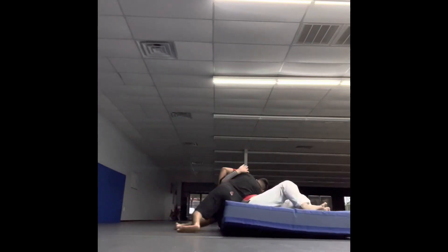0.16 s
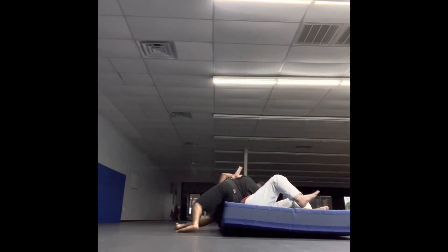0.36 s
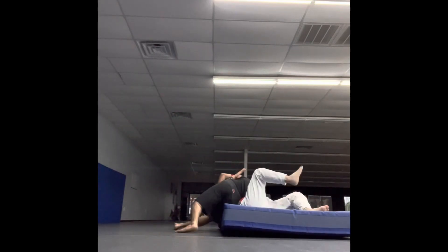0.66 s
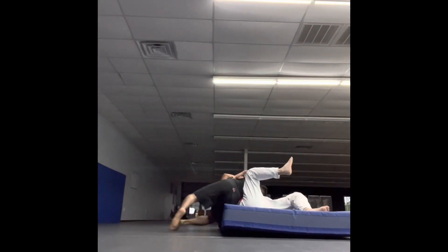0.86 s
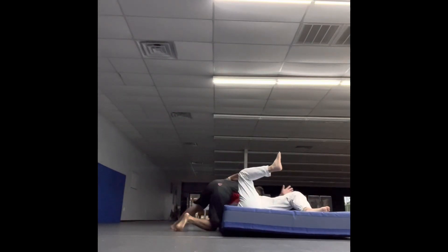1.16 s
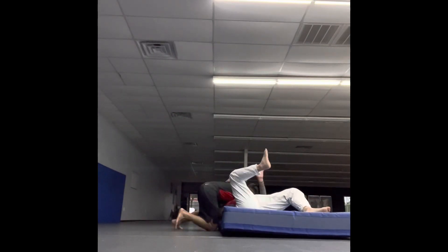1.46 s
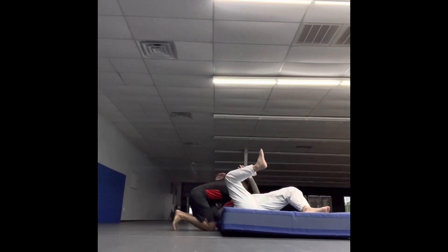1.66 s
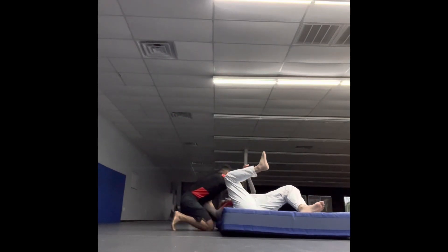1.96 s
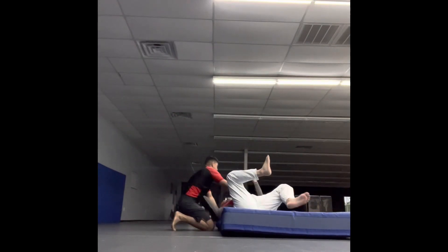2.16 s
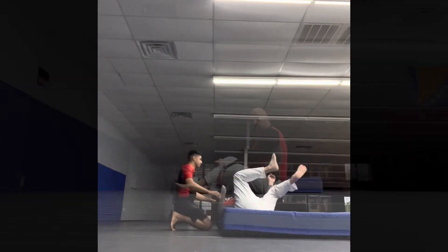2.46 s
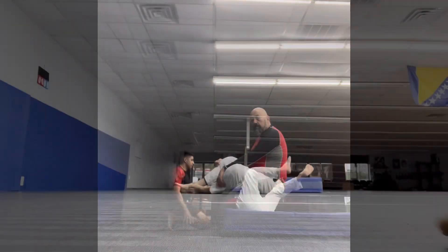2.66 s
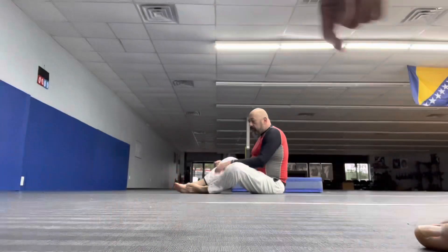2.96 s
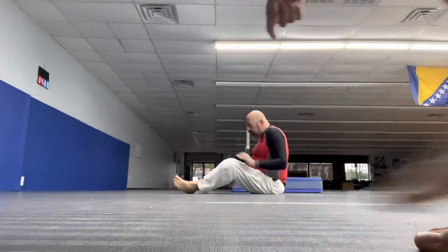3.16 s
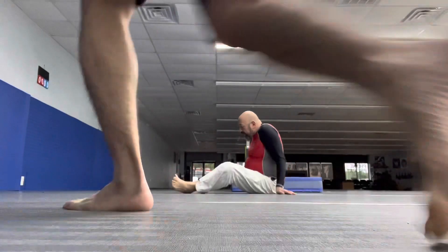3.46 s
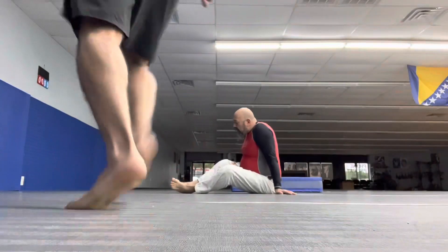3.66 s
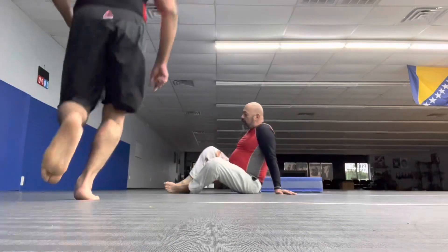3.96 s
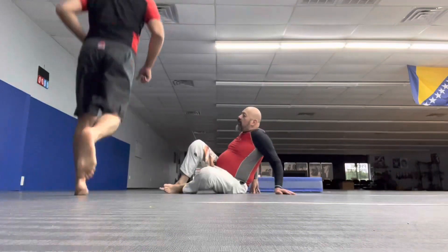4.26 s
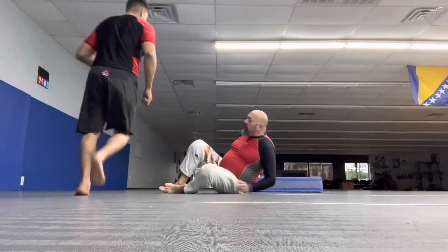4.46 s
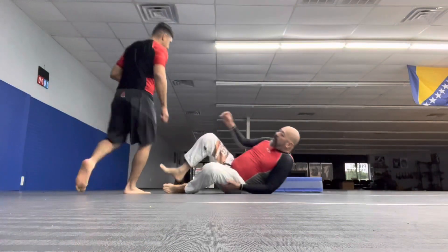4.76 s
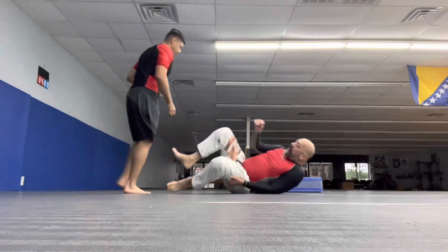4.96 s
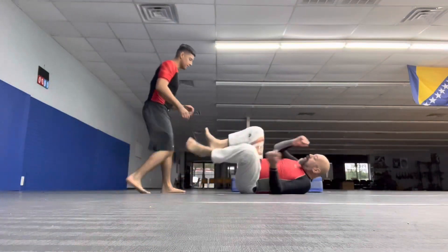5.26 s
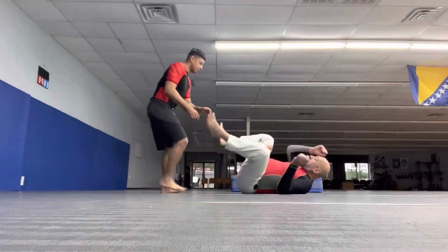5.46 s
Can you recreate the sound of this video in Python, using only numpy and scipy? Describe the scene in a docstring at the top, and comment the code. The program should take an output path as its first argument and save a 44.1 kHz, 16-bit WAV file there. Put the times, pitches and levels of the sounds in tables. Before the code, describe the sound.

In a quietly humming gym, a phone on the floor picks up a heavy thud on a padded mat, then rustling cloth, a short smack and a few gentler bumps. Next, bare footsteps pass very close, moving from right to left with soft knocks, low heel thumps and small ticks of skin peeling off the mat. The steps ease into lighter shuffling and sole rubs toward the end.

```python
"""A gym, heard by a phone on the floor from two places, one fading into the other. First, bodies land
and roll on a thick crash mat a few metres off: foam modes thud, vinyl slaps, cloth slides. Then bare
feet step, stick and scuff on the floor mat beside the phone: bending waves knock, skin ticks as it
lets go, soles rub. The hall hums quietly under both. Left and right are the phone's two ports."""
import sys
import numpy as np
from scipy import signal
from scipy.fft import rfft, irfft, next_fast_len
from scipy.io import wavfile
from scipy.ndimage import uniform_filter1d

SR = 44100
rng = np.random.default_rng(int(sys.argv[2]) if len(sys.argv) > 2 else 0)


def master(y):
    """Save y as 16-bit WAV."""
    cut = np.clip(np.atleast_2d(y).T, -1, 1)
    pcm = np.round(cut * 32767)  # scale
    wavfile.write(sys.argv[1], SR, pcm.astype(np.int16))


N = 248077
T = np.arange(N) / SR

# position of the feet: t/s, right port's lead/ms, L-R/dB
FOOT_PATH = [(2.6, .7, -5), (3.05, .75, -5), (3.25, .5, -4), (3.37, -.1, 5), (3.4, .3, -3), (3.49, .25, 0),
             (3.63, -.15, 4), (3.78, -.35, 6), (4.3, -.25, 4), (4.6, 0, 3), (5.1, .15, 3), (5.63, 0, 3)]
# stereo width beside the floor mat: f/Hz, side-mid/dB
NEAR_WIDTH = [(60, -13), (110, -13), (200, -7), (380, -2), (700, -2.5), (1290, -1), (2380, 3), (4400, 1),
              (8120, 12), (15000, -15)]


def landings():
    """Bodies press in unevenly and ring the crash mat's modes; its vinyl slaps. Returns thud, slap."""
    # impacts: t/s, level/dB, f/Hz, t60/s, slap-thud/dB
    impacts = [(0.004, -26.5, 163, 0.12, -21), (0.031, -31, 151, 0.072, -22.5),
               (0.055, -42, 210, 0.048, -21.5), (0.098, -28, 190, 0.16, -13),
               (0.15, -16, 179.4, 0.072, -17.5), (0.144, -31.5, 200, .04, -4), (0.173, -20, 190, 0.32, -14),
               (0.216, -23.5, 123, 0.13, -22), (0.42, -40.5, 149, 0.39, -28.5),
               (0.448, -39.5, 144.4, 0.14, -21), (1.122, -26, 433, 0.046, -19),
               (1.131, -37.5, 630, 0.037, -2), (1.135, -10.5, 218, 0.024, -13.5),
               (1.141, -15, 313, 0.024, -19), (1.146, -19.5, 378, 0.048, -20),
               (1.159, -24.5, 73, 0.17, -14), (1.201, -37, 76, 0.16, -19), (1.29, -25, 223.6, 0.1, -24),
               (1.334, -35.5, 110, 0.11, -26), (1.448, -45, 210, 0.15, -21), (1.56, -32, 168, 0.025, -36),
               (1.657, -43.5, 129, 0.14, -5), (1.949, -30.5, 180, 0.066, -20)]
    # foam and floor modes: f/Hz, t60/s
    modes = [(71, 0.15), (125, 0.018), (155, 0.57), (200, 0.07), (248, 0.88), (305, 0.076), (385, 0.35),
             (480, 0.032), (620, 0.014), (720, 0.0079)]
    # vinyl snaps: t/s, level/dB, f/Hz, t60/s
    snaps = [(0.0225, -26, 12500, 0.017), (0.114, -36, 5040, 0.007), (0.114, -29, 12500, .008),
             (0.152, -45.5, 12000, 0.011), (0.165, -36.5, 2330, 0.099), (0.175, -42, 2720, 0.12),
             (0.364, -42, 5830, 0.017), (0.3655, -40, 12000, 0.011), (0.3915, -48, 12040, 0.015),
             (0.801, -33.5, 2150, 0.025), (0.799, -32.5, 3980, 0.014), (0.94, -45, 2150, 0.021),
             (1.1308, -21, 5000, 0.012), (1.1315, -44, 2220, 0.023), (1.624, -48, 5160, .1),
             (1.822, -54, 805, .03), (1.826, -45, 1500, 0.022), (2.378, -58.5, 1550, 0.022)]
    # skin and cloth on taut vinyl: t/s, length/s, start f/Hz, end f/Hz, width/Hz, level/dB
    vinyl_rasps = [(0.161, 0.03, 2695, 2680, 90, -38.5), (0.169, .034, 2233, 2150, 120, -44.5),
                   (0.803, 0.061, 2380, 2320, 80, -47), (.86, 0.076, 2210, 1980, 79, -56),
                   (0.904, .048, 2990, 2920, 110, -48), (.797, .012, 2070, 2070, 202, -46.5),
                   (0.939, .05, 2304, 2256, 89.5, -55.5), (1.13, 0.028, 690, 683, 50, -36),
                   (1.128, 0.023, 2110, 2080, 70, -47), (1.129, 0.029, 1478, 1710, 200, -46),
                   (1.97, 0.14, 2040, 2250, 200, -66), (1.98, 0.057, 1705, 1790, 150, -62.5),
                   (2.374, .014, 1640, 1650, 150, -66), (2.41, 0.098, 2250, 2240, 200, -71)]
    contact_s, smack_db, mat_cutoff_hz = 0.0062, -15.5, 67
    thud, slap, t = np.zeros(N), np.zeros(N), T[:SR // 3]
    for s, db, hz, t60, slap_db in impacts:
        push = rng.standard_normal((3, len(t))) * t / contact_s * np.exp(-t / contact_s)
        mat = sum(ring(mode_hz, 2 / (1 / mode_t60 + 1 / t60), t) / (1 + (7.4 * np.log2(mode_hz / hz)) ** 2)
                  for mode_hz, mode_t60 in modes)
        add(thud, s, band(signal.fftconvolve(push[0], mat)[:len(t)], mat_cutoff_hz, 640), db)
        add(thud, s, band(push[1], 470, 750), db + slap_db + smack_db)
        add(slap, s, push[2] * np.exp(-t / 0.0063), db + slap_db)
    for s, db, hz, t60 in snaps:
        crack = rng.standard_normal(6000) * 1000. ** (-t[:6000] / t60)
        add(slap, s, band(crack, 0.73 * hz, 1.51 * hz) + 0.2 * crack, db)
    thud = band(thud, 48, 1500)
    return thud + tail(thud, 1.0, -25.5, 380), slap + tail(slap, 0.45, -8.5, 3000) + rasps(vinyl_rasps)


def cloth_on_vinyl(slap, rustle_db):
    """Cloth slides on the vinyl; the upright phone's ports colour both this friction and the slaps."""
    # slides: t/s, rise/s, hold/s, fall/s, level/dB, relative hiss above 6 kHz/dB
    slides = [(0.0, .01, 0.016, 0.13, -37, -2.5), (0.099, 0.069, 0.0041, 0.031, -45.5, -2),
              (0.173, 0.075, .005, 0.075, -37.5, -32), (0.297, 0.14, 0.056, 0.097, -57.5, -19),
              (0.374, 0.015, 0.021, 0.02, -65, -5), (0.734, 0.014, 0.062, 0.13, -56.5, -30),
              (0.802, 0.004, 0.075, 0.099, -51.5, 0), (0.906, 0.11, 0.046, 0.062, -46.5, -7),
              (1.126, 0.0039, 0.009, 0.059, -36.5, -11.5), (1.607, 0.23, .02, 0.36, -60, -8.5),
              (1.819, 0.036, 0.0057, 0.15, -58.5, -26), (1.96, 0.19, 0.17, 0.072, -57.5, -9.5),
              (2.415, 0.18, 0.033, 0.054, -65.5, 0)]
    # cloth spectrum at the phone: f/Hz, level/dB
    spectrum = [(180, -30), (300, 1.5), (567, -2), (627, -8.5), (694, -6), (1250, -7.5), (1700, -4.5),
                (2130, -1), (3710, -11.5), (6240, -16.5), (7900, -28), (8400, -53), (9900, -40),
                (10500, -24), (13300, -18), (15700, -23.5), (16500, -14)]
    # its side spectrum: f/Hz, level/dB
    side_spectrum = [(300, -6.5), (1100, 5), (2000, -12), (2800, -4), (8800, -5), (12500, -10.5),
                     (13500, -32.5)]
    # port resonances: f/Hz, width/Hz, level/dB
    resonances = [(2150, 204, -7.5), (2770, 110, -6.5)]
    # gain below 1.3 kHz: t/s, level/dB
    body_curve = [(0, -1), (0.3, 5.5), (0.46, -4.5), (0.53, -7), (0.7, 4), (0.74, 1), (1.0, 0), (1.12, 1),
                  (1.2, -0.5), (1.3, 6), (1.6, 3), (1.85, 3.5), (2.0, -4.5), (2.13, -6), (2.18, -3),
                  (2.235, -11), (2.255, 6), (2.28, 2), (2.31, -11), (2.44, -8), (2.47, -4), (2.5, -12),
                  (2.55, 1), (2.62, 2)]
    top_hiss_rest_db, side_db = -15, -8
    *shape, db, top_hiss_db = np.transpose(slides)
    slide_db = strokes(*shape, db, rustle_db)
    top_hiss_db = strokes(*shape, db + top_hiss_db, rustle_db + top_hiss_rest_db) - slide_db
    friction = rng.standard_normal((2, N)) * undb(slide_db + 1.05 * walk(200))
    impulse = np.arange(4096) == 0

    def at_phone(x):
        """Colour at unit power gain, then add the port resonances."""
        x = colour(x, spectrum) / np.linalg.norm(colour(impulse, spectrum))
        return x + sum(undb(db) * signal.lfilter(*signal.iirpeak(hz, hz / width_hz, SR), x)
                       for hz, width_hz, db in resonances)

    cloth, crack = at_phone(friction[0]), at_phone(slap)
    body = band(cloth + crack, 110, 1307) * undb(curves(body_curve)[0])
    treble_lift = np.std(band(cloth, 1860, 7000)) / np.std(band(cloth, 10000, 16400))
    top_hiss = band(cloth, 6000, 22000) * treble_lift * undb(top_hiss_db)
    mid = body + band(cloth + crack, 1366, 4440) + band(crack, 4430, 22000) + top_hiss
    # the ports cancel near 9 kHz in their sum, not in their difference
    side = colour(tail(slap, 0.05, 0, 20000) + friction[1], side_spectrum)
    side *= undb(side_db) / np.linalg.norm(colour(impulse, side_spectrum))
    return np.array([mid + side, mid - side])


def steps():
    """Each contact sends a bending wave through the floor mat; heavy ones also boom in the floor."""
    # toes, soles, hands: t/s, level/dB, f/Hz, L-R/dB
    toes = [(2.6265, -29.5, 540.0, -5.5), (2.6351, -35, 1110, -9.5), (2.6366, -34, 604, -8),
            (2.652, -47, 624, -2.0), (2.6756, -40, 600.0, -3), (2.6887, -40.0, 653, -12),
            (2.7104, -38.5, 610.0, -4.0), (2.923, -36, 600.0, -2.5), (2.9456, -40, 570.0, -11),
            (2.9547, -25.5, 530.0, -4.0), (2.9633, -36, 1015, -5), (2.9744, -31, 556, -1.0),
            (2.9807, -39, 485, -2), (3.0026, -30, 538, 0), (3.0099, -28.5, 1110.0, -13),
            (3.0155, -32, 1000.0, -17), (3.0164, -18.1, 373, -1), (3.0244, -22.5, 1080.0, -7),
            (3.0258, -14.5, 497, -6.5), (3.0313, -26, 1020, -17), (3.0339, -21, 430, -7.0),
            (3.0438, -44, 520.0, 6), (3.0521, -41, 500.0, 1.0), (3.236, -34.5, 605, -7.5),
            (3.2638, -41.5, 550, -7.0), (3.3965, -31.5, 1040.0, -1), (3.3985, -19, 610, -1),
            (3.408, -29, 614, -2), (3.4134, -22.5, 1044, -8.0), (3.4152, -16.6, 582, -9.5),
            (3.4298, -27, 663, -8.0), (3.4449, -25.5, 556, -4), (3.4531, -31.0, 520.0, -6),
            (3.4579, -27.5, 1150, -12), (3.4611, -17.9, 422, -2), (3.468, -42, 1110.0, -6.0),
            (3.4695, -26, 600, -1), (3.4762, -36.6, 1200, -4.0), (3.4788, -20, 506, 0),
            (3.4854, -32.5, 520, 1.0), (3.6349, -28.5, 620, 1.5), (3.6874, -31.5, 528, 6.5),
            (3.7458, -32, 576, 5.0), (3.7518, -30.8, 580.0, 6.0), (3.7776, -36, 620.0, 10),
            (3.7941, -32.6, 575, 8), (3.806, -42, 520, 2), (3.8213, -36, 537, 6), (3.8443, -38, 550.0, 9),
            (3.8615, -37.5, 970, 1), (3.8618, -30, 348, 5.0), (3.8791, -32.5, 600.0, 7.0),
            (3.892, -39, 600.0, 1), (4.0024, -35, 980, 8), (4.0043, -28.0, 495, 5), (4.0236, -37.5, 660, 4),
            (4.0437, -43, 514, 7), (4.127, -37, 500, -1), (4.142, -35.7, 545, -1), (4.1549, -33.1, 535, -1),
            (4.1736, -37, 490.0, 2), (4.1907, -33.2, 450.0, 6), (4.1996, -30, 490.0, 9),
            (4.2102, -37.9, 440.0, 1), (4.2873, -29, 466, 7.0), (4.2957, -39.4, 930, 2.0),
            (4.3005, -22.7, 483, 5), (4.3102, -23, 430, -1), (4.3361, -36.7, 487, 1),
            (4.3562, -43, 465, -4), (4.5981, -33, 486, 0), (4.6076, -31, 445, 0), (4.6152, -42, 497, 8),
            (4.623, -42, 560.0, 6), (4.6307, -46, 445, 2.0), (4.6538, -44, 470.0, 4.0),
            (4.6646, -44.5, 474, 9), (4.7027, -40.7, 510, 6), (5.0616, -35, 440.0, 2.0),
            (5.0965, -28.5, 383, 3), (5.107, -33.5, 346, 6), (5.214, -40, 494, 4), (5.2224, -33, 463, 2),
            (5.2327, -31, 400.0, 4), (5.2459, -39.5, 530, -4), (5.2763, -41, 460.0, 1),
            (5.2848, -37, 488, 3.0), (5.305, -41, 510.0, 1.0), (5.6098, -30.5, 463, 2),
            (5.6173, -38, 570, -2), (5.6228, -39.5, 514, -2.0)]
    # heels, seat: t/s, level/dB, f/Hz, L-R/dB
    heels = [(3.02, -27, 268, -10), (3.028, -28.5, 206, -7), (3.423, -23, 174.5, 0),
             (3.465, -25.5, 256, -1), (3.869, -23, 188, 5), (3.89, -41, 166, 7), (4.011, -35, 230, 3),
             (4.033, -36.5, 149.7, -4), (4.209, -41.5, 186, 8), (4.303, -21.5, 170, -2),
             (4.325, -33.5, 134, 13), (4.347, -36, 145, 0), (4.603, -38.5, 188, 1),
             (4.692, -37.5, 183.4, 2), (4.716, -41.5, 118, -9), (4.732, -43, 83, 0),
             (5.102, -49.5, 190, -3), (5.226, -43.5, 212, 2), (5.616, -41, 190, 5)]
    knocks, boom, t = np.zeros((2, N)), np.zeros(N), T[:SR // 4]
    path_s, lead_ms, _ = np.transpose(FOOT_PATH)
    for contacts, cycles_per_db, base_glide, rough in [(toes, -.02, .3, .2), (heels, -.07, .35, .3)]:
        for s, db, hz, pan_db in contacts:
            lead_rad = 2 * np.pi * min(hz, np.sqrt(hz * 500)) * np.interp(s, path_s, lead_ms) / 1000
            # harder contacts are shorter and sweep further down
            cycles = 2.5 + cycles_per_db * (db + 28.5)
            glide = base_glide + 0.0656 * max(db + 31, 0)
            wave, rise_s = bending_wave(hz, cycles, glide, rough, lead_rad)
            for port, sign in enumerate((1, -1)):
                add(knocks[port], s - rise_s, wave[port], db + sign * pan_db / 2)
    for s, db, *_ in heels:
        push = rng.standard_normal(len(t)) * t * np.exp(-t / 0.011)
        add(boom, s, band(push, 56, 120), db - 14.5)
    direct = knocks + skin_ticks()
    return boom + direct + np.array([tail(x, 0.072, -15, 1400) for x in direct])


def bending_wave(hz, cycles, glide, rough, lead_rad):
    """Treble arrives first, so a ragged packet slides down in pitch. Returns stereo wave, rise/s."""
    rise_s = cycles / hz / 2.3
    u = T[:int(6 * rise_s * SR)] / rise_s
    turns = hz * rise_s * ((1.07 - 0.42 * glide) * u + glide * (1 - np.exp(-u)))
    scatter = unit(band(rng.standard_normal((2, len(u) + 2000)), 0.58 * hz, 1.58 * hz)[:, 2000:])
    chirp = np.sin(2 * np.pi * (turns + rng.uniform()) + np.array([[0], [lead_rad]]))
    envelope = u ** 1.35 * np.exp(-u ** 1.45 / 1.02)
    return (chirp + rough * scatter) * envelope, rise_s


def skin_ticks():
    """Sticking skin lets go of the mat with a tick."""
    # releases: t/s, level/dB, L-R/dB, f/Hz
    releases = [(2.59, -42, 1, 8000), (2.6232, -34.5, -4, 6900), (2.953, -22, -4, 6040),
                (3.009, -27, -12, 2210), (3.013, -24, -6, 3900), (3.0236, -28, -16, 2260),
                (3.0347, -33, -3.5, 2270), (3.372, -47, 3, 7600), (3.4123, -30, 1, 4570),
                (3.4565, -35, 0, 3200), (3.458, -42, 0, 9000), (3.466, -40, -0.5, 4820),
                (3.4764, -46, 0.0, 2270), (3.685, -41, 9, 11000), (3.7475, -34, -1, 9000),
                (3.75, -39, 0, 7000), (3.7756, -43, 8, 3160), (3.856, -44, -9, 2400),
                (4.0008, -52, 0.5, 4000), (4.1672, -47, -1, 4030), (4.198, -48, -1, 2100),
                (4.284, -34, 1, 7000), (4.295, -38, -2, 5000), (4.6515, -41, 0, 11000),
                (4.718, -50, 0, 7500), (4.5133, -64, 1, 4420), (4.595, -48, -0.5, 2050),
                (5.2, -40, -1.0, 8800), (5.2198, -31.5, 2, 6560), (5.58, -47, -11, 7310)]
    left, shared, own = np.zeros((3, N))
    for s, db, pan_db, hz in releases:
        burst = rng.standard_normal((2, 800)) * 1000. ** (-T[:800] / 0.0079)
        tick = band(burst, 0.38 * hz, min(2.1 * hz, 18000))
        add(left, s, tick[0], db + 0.46 * pan_db)
        add(shared, s, tick[0], db - 0.75 * pan_db)
        add(own, s, tick[1], db - 0.5 * pan_db)
    return np.array([left, right_port(shared, own)])


def scuffs():
    """Skin and cloth rub the floor mat. Returns bright scuff and low shuffle, both stereo."""
    # rubs: t/s, rise/s, fall/s, scuff/dB, shuffle/dB, drag/dB, hiss-scuff/dB
    rubs = [(2.628, 0.018, 0.025, -53.5, -43.5, -52, -2), (2.69, 0.051, 0.12, -54, -69, -69, 1.5),
            (2.954, 0.026, 0.077, -37, -42.5, -47, -6.5), (2.988, 0.075, 0.06, -47.5, -50, -40, -18),
            (3.015, 0.018, 0.026, -41, -31, -32.5, -20), (3.25, 0.97, 0.24, -58, -56, -55, -0.5),
            (3.371, 0.003, 0.024, -37.5, -51, -51, 0.5), (3.386, 0.014, 0.0098, -41, -60, -56, -3),
            (3.414, 0.046, 0.072, -49, -36.5, -43.5, -19), (3.46, 0.0061, 0.056, -52, -30, -39.5, 0),
            (3.62, 0.19, 0.23, -55, -52.5, -73, -4.5), (3.857, 0.0071, 0.058, -57, -31.5, -62, -3),
            (4.003, 0.09, 0.25, -64, -46.5, -52, -16), (4.2, 0.14, 0.052, -58.5, -43, -68, -5.5),
            (4.297, 0.012, 0.11, -53, -38.5, -51, -3), (4.371, 0.091, 0.078, -51.5, -65, -49.5, -2),
            (4.51, 0.039, 0.033, -52.5, -69, -77, -5), (4.598, 0.076, 0.062, -56.5, -55, -53.5, -6),
            (4.67, 0.069, 0.13, -56.5, -45, -59, -2.5), (5.11, 0.21, 0.43, -61.5, -54, -58, -17),
            (5.22, 0.016, 0.032, -49.5, -37.5, -50, -19), (5.249, 0.061, 0.26, -61.5, -46.5, -78, -20),
            (5.582, 0.0055, 0.24, -57, -52.5, -57, -7), (5.63, 0.028, .05, -71, -41, -66, -9)]
    # constant shifting of the feet: t/s, scuff/dB, shuffle/dB, drag/dB
    shifting = [(2.55, -79, -55, -76), (2.66, -74, -65, -58), (2.8, -70, -80, -63), (2.91, -74, -97, -67),
                (3.06, -56, -69, -61), (3.36, -83, -93, -84), (3.55, -75, -49.5, -55.5),
                (3.84, -66, -57.5, -55.5), (4.1, -68, -57, -69), (4.26, -82, -46.5, -75),
                (4.5, -77, -52.5, -64), (4.76, -69.5, -54.5, -66), (4.9, -68, -63.5, -66),
                (5.05, -69.5, -76, -83), (5.35, -68, -56, -66), (5.46, -79, -66, -90),
                (5.55, -82, -95, -110)]
    # soles brushing the mat's grain: t/s, length/s, start f/Hz, end f/Hz, width/Hz, level/dB
    swishes = [(2.67, 0.066, 9500, 9000, 2500, -50), (2.81, 0.065, 8000, 6900, 2500, -50.5),
               (2.915, 0.024, 6000, 5980, 2500, -47), (3.6, 0.091, 6000, 6900, 2000, -52),
               (4.32, 0.094, 6200, 7030, 1800, -46), (4.31, .04, 3200, 3200, 1200, -48),
               (4.49, 0.044, 4600, 4390, 1500, -50.5), (4.57, .05, 4200, 4220, 1500, -54),
               (4.652, 0.049, 7500, 6530, 2500, -47)]
    # shuffle spectrum: f/Hz, level/dB
    spectrum = [(24, -53), (40, -8), (86, -14.5), (218, -2), (314, -2), (366, -4), (574, -11), (1570, -28),
                (2500, -38), (3250, -40), (5500, -120)]
    hold_s, hiss_rest_db, spread = 0.004, -2.5, 0.71
    rest_db = curves(shifting)
    s, rise_s, fall_s, *peak_db, hiss_db = np.transpose(rubs)
    shape = s, rise_s, hold_s, fall_s
    scuff_db, shuffle_db, drag_db = (strokes(*shape, db, rest) for db, rest in zip(peak_db, rest_db))
    hiss_db = strokes(*shape, peak_db[0] + hiss_db, rest_db[0] + hiss_rest_db) - scuff_db
    left, own = (skin_friction(scuff_db, drag_db, hiss_db) + rasps(swishes) for _ in range(2))
    shuffle = grainy_noise(spectrum, 3.4, 90) * undb(shuffle_db)
    shuffle = shuffle + spread * (widen(shuffle, NEAR_WIDTH, 0.055) - shuffle)
    return np.array([left, right_port(left, own)]), shuffle


def skin_friction(scuff_db, drag_db, hiss_db):
    """Gritty friction at one port: each band grips and slips in patches of its own."""
    # dragging sole: f/Hz, level/dB
    drag_spectrum = [(700, 1), (1200, -5.5), (2000, -6.5), (2600, -10), (4200, -17)]
    bands_hz = (3000, 5140), (5000, 7950), (8500, 14500)
    grit = rng.standard_normal(N) * undb(2.8 * walk(400))
    low, mid, top = (unit(band(grit, *hz)) * undb(2 * walk(30)) for hz in bands_hz)
    drag = grainy_noise(drag_spectrum, 3.0, 200) * undb(drag_db)
    return undb(scuff_db) * (unit(low + 1.45 * mid) + top * undb(hiss_db)) + drag


def rasps(table):
    """Rubbing in wavering bands that slide a little in pitch."""
    out = np.zeros(N)
    for s, length_s, from_hz, to_hz, width_hz, db in table:
        u = np.arange(int(length_s * SR)) / (length_s * SR)
        lowpass = signal.butter(2, width_hz / 2, fs=SR, output="sos")
        grip = unit(signal.sosfilt(lowpass, rng.standard_normal((2, len(u) + 2000)))[:, 2000:])
        phase = 2 * np.pi * length_s * (from_hz * u + (to_hz - from_hz) * u ** 2 / 2)
        rasp = (0.9 + grip[0]) * np.sin(phase) + grip[1] * np.cos(phase)
        add(out, s, rasp * np.sin(np.pi * u ** 0.58), db)
    return out


def sole_rolls():
    """Small crackling contacts of a rolling sole ring the hollow under the mat."""
    # rolls: t/s, rise/s, hold/s, fall/s, level/dB
    rolls = [(2.674, 0.034, 0.029, .12, -49), (2.752, 0.033, 0.016, 0.079, -54.5),
             (2.923, 0.049, 0.045, .05, -55), (3.132, 0.14, 0.076, 0.066, -49),
             (3.225, .04, 0.061, 0.11, -50), (3.86, 0.017, .02, 0.19, -51), (4.03, .02, 0.024, 0.027, -54),
             (4.135, 0.018, 0.075, 0.067, -47.5), (3.382, 0.018, .02, 0.027, -38.5),
             (3.436, .01, .01, .03, -44), (4.453, 0.1, 0.015, 0.041, -62.5),
             (5.03, 0.019, 0.014, 0.027, -66), (5.252, 0.045, 0.022, 0.074, -65)]
    # the hollow's response: f/Hz, level/dB
    hollow = [(250, -28), (420, -5), (580, 4), (750, -3), (1000, -5), (1300, -18), (1800, -45)]
    grains = grainy_noise(hollow, 2.4, 100)
    scatter = np.array([grainy_noise(hollow, 4.6, 130) for _ in range(2)])
    return (grains + 0.49 * scatter) * undb(strokes(*np.transpose(rolls), rest_db=-120.))


def mat_rumble(level_db):
    """The crash mat rumbles under shifting bodies."""
    # rumble spectrum: f/Hz, level/dB
    spectrum = [(15, -30), (25, -37.5), (54, 7.5), (92, -14.5), (128, 3.5), (233, 3.5), (541, -10.5),
                (620, -32.5), (900, -32.5), (1170, -45.5), (1980, -120)]
    return grainy_noise(spectrum, 1.0, 28) * undb(level_db)


def hall_hum(near):
    """Low, slightly wavering noise of the hall at either place."""
    # hum at the first place: f/Hz, level/dB
    far_spectrum = [(15, -75), (25, -14), (105, -1.5), (159, -5.5), (296, -10), (321, -28), (410, -8),
                    (457, -50), (524, -47.5), (878, -78), (1780, -34), (2000, -32), (2150, -26),
                    (2330, -32.5), (2500, -37), (2820, -39.5), (16500, -90)]
    # hum at the second place: f/Hz, level/dB
    near_spectrum = [(15, -47), (25, -47), (53, 7), (150, -4), (226, 1), (266, -26.5), (422, -1.5),
                     (553, -46), (634, -66), (687, -63), (2210, -29.5), (6730, -32), (16500, -88)]
    if near:
        return grainy_noise(near_spectrum, 1.4, 4) * undb(-59.5)
    return grainy_noise(far_spectrum, 0.81, 67) * undb(-60.5)


def tail(x, t60, db, hz):
    """Reflections: decaying noise, darker above hz."""
    t = T[:int(t60 * SR)]
    decay = rng.standard_normal(len(t)) * 1000. ** (-t / t60)
    echo = signal.lfilter([1], [1, -np.exp(-2 * np.pi * hz / SR)], decay)
    return signal.fftconvolve(x, echo * undb(db) / np.sqrt(np.sum(echo ** 2)))[:N]


def widen(mid, side_spectrum, t60):
    """The ports hear different early reflections, so the side is a smeared copy of the mid."""
    side = colour(tail(mid, t60, 0, 24000), side_spectrum)
    return np.array([mid + side, mid - side])


def pan_to_feet(pair):
    """The nearer port hears the mat earlier and louder."""
    lead_ms, pan_db = curves(FOOT_PATH)
    return np.array([np.interp(T - sign * lead_ms / 2000, T, x) * undb(sign * pan_db / 2)
                     for x, sign in zip(pair, (1, -1))])


def right_port(left, own):
    """In the treble the right port hears a phase-turned copy of the left plus sound of its own."""
    # phase between the ports: f/Hz, right port's lead/rad
    phase_lead = [(2000, -1.58), (3000, -1.8), (4500, 0.76), (6000, 1.9), (7500, 1.58), (11000, 1.45),
                  (16000, 1.8)]
    coherence, size = 0.45, next_fast_len(N)
    lead_rad = np.interp(np.fft.rfftfreq(size, 1 / SR), *np.transpose(phase_lead))
    turned = irfft(rfft(left, size) * np.exp(1j * lead_rad), size)[:N]
    return coherence * turned + np.sqrt(1 - coherence ** 2) * own


def strokes(times_s, rises_s, holds_s, falls_s, levels_db, rest_db):
    """Level/dB of rubbing strokes over a resting level; each rise or fall time spans 20 dB."""
    power = undb(rest_db) ** 2 + np.zeros(N)
    for s, rise, hold, fall, db in np.broadcast(times_s, rises_s, holds_s, falls_s, levels_db):
        heard = slice(max(int((s - 3 * rise) * SR), 0), int((s + hold + 3 * fall) * SR))
        t = T[heard]
        drop_db = 20 * np.maximum(np.maximum((s - t) / rise, (t - s - hold) / fall), 0)
        power[heard] += undb(db - drop_db) ** 2
    return 10 * np.log10(power)


def grainy_noise(spectrum, grain_db, rate_hz):
    """Coloured noise, rms 1, whose level flickers, as when a contact grips and lets go."""
    return unit(colour(rng.standard_normal(N) * undb(grain_db * walk(rate_hz)), spectrum))


def walk(rate_hz):
    """Ramps between random levels; spread near 1."""
    hold = int(SR / rate_hz)
    return uniform_filter1d(np.repeat(rng.standard_normal(N // hold + 1), hold), hold)[:N]


def ring(hz, t60, t):
    """One decaying mode."""
    return np.sin(2 * np.pi * hz * t) * 1000. ** (-t / t60)


def colour(x, spectrum, size=4096):
    """Minimum-phase filter through (f/Hz, level/dB) points."""
    hz, db = np.transpose(spectrum)
    grid_hz = np.arange(size + 1) * SR / 2 / size + 1
    cepstrum = irfft(np.log(undb(np.interp(np.log(grid_hz), np.log(hz), db))))
    cepstrum[1:size] *= 2
    cepstrum[size + 1:] = 0
    return signal.fftconvolve(x, irfft(np.exp(rfft(cepstrum)))[:size])[:len(x)]


def band(x, lo_hz, hi_hz):
    """Band-pass."""
    return signal.sosfilt(signal.butter(3, [lo_hz, hi_hz], "band", fs=SR, output="sos"), x)


def curves(table):
    """Per-sample curve of each column after t/s."""
    s, *columns = np.transpose(table)
    return [np.interp(T, s, column) for column in columns]


def add(out, s, x, db):
    """Mix x in at time s with peak db."""
    i = int(s * SR)
    out[i:i + len(x)] += (undb(db) * x / np.abs(x).max())[:N - i]


def undb(db):
    """dB to gain."""
    return 10 ** (np.asarray(db) / 20)


def unit(x):
    """Scale to rms 1."""
    return x / np.sqrt(np.mean(x ** 2))


def scene():
    """The far crash mat fades into the near feet at equal power."""
    # constant shifting of the bodies: t/s, cloth rustle/dB, mat rumble/dB
    shifting = [(0.0, -48, -25), (0.13, -57, -37.5), (0.24, -72.5, -45), (0.42, -67, -49.5),
                (0.47, -63.5, -64), (0.54, -72.5, -63), (0.7, -77.5, -64), (0.74, -68, -47),
                (0.79, -48, -49), (0.82, -52.5, -56), (1.11, -58, -62), (1.18, -59, -70),
                (1.25, -59.5, -54), (1.36, -59.5, -66), (1.52, -66.5, -47), (1.88, -69.5, -54.5),
                (2.2, -68, -63), (2.45, -67.5, -69.5), (2.62, -71, -55.5)]
    # stereo width across the hall: f/Hz, side-mid/dB
    far_width = [(60, -42.5), (110, -34), (200, -27), (380, -14), (700, 2.5), (1290, 5), (2380, -3),
                 (4400, 5), (8120, 2), (15000, -18.5)]
    fade_s = (2.58, 2.62)
    rustle_db, rumble_db = curves(shifting)
    thud, slap = landings()
    far = cloth_on_vinyl(slap, rustle_db)
    far += widen(thud + mat_rumble(rumble_db) + hall_hum(near=False), far_width, 0.01)
    scuff, shuffle = scuffs()
    near = steps() + scuff + pan_to_feet(sole_rolls() + shuffle)
    near += widen(hall_hum(near=True), NEAR_WIDTH, 0.049)
    mix = np.interp(T, fade_s, [0, 1])
    return far * np.sqrt(1 - mix) + near * np.sqrt(mix)


def record(dry):
    """The phone cuts the top."""
    cutoff_hz = 15900
    return signal.sosfilt(signal.ellip(10, .2, 60, cutoff_hz, fs=SR, output="sos"), dry)


dry = scene()
out = record(dry)
master(out)
```